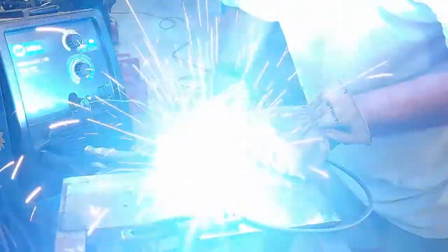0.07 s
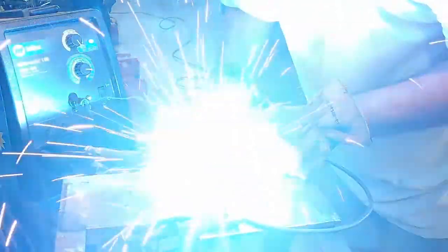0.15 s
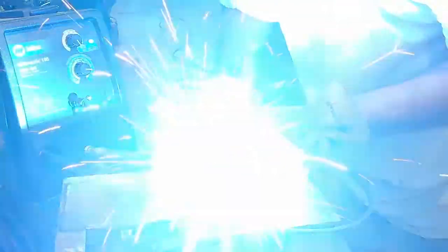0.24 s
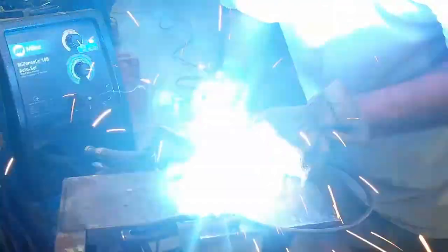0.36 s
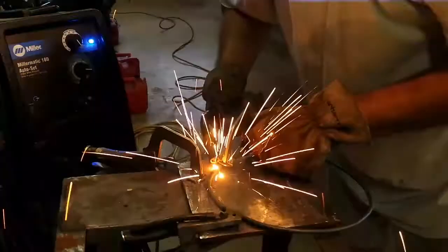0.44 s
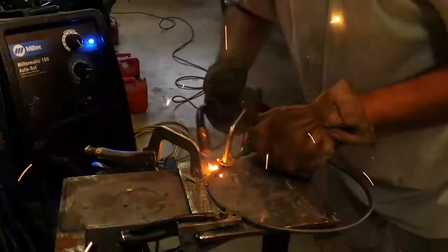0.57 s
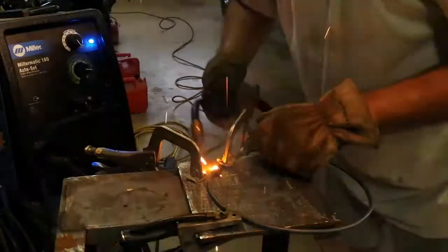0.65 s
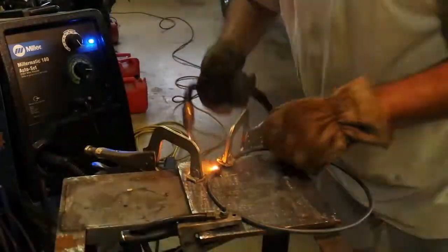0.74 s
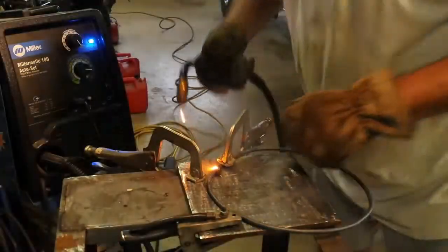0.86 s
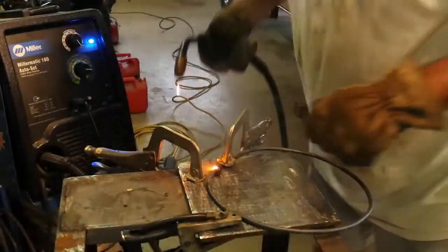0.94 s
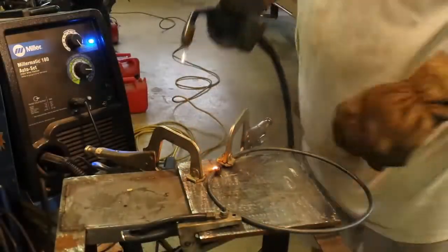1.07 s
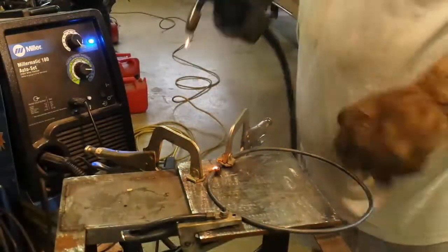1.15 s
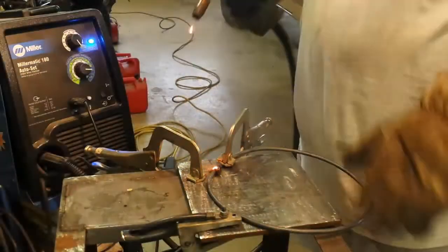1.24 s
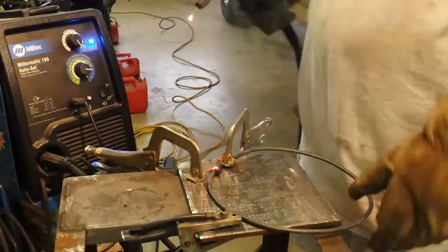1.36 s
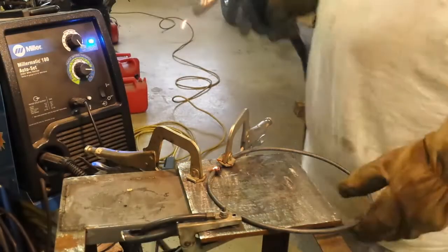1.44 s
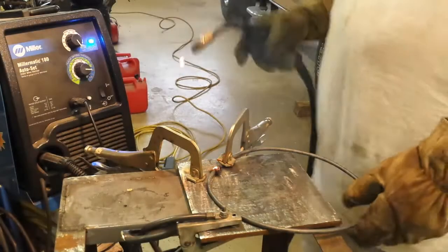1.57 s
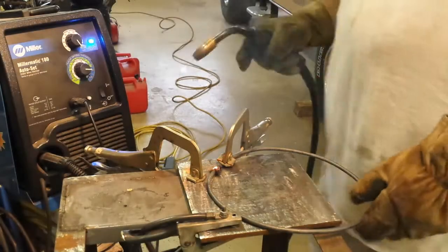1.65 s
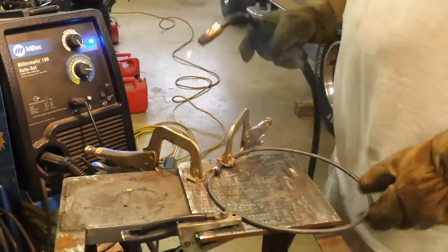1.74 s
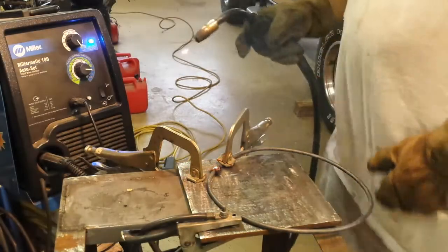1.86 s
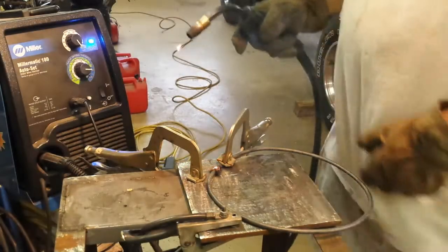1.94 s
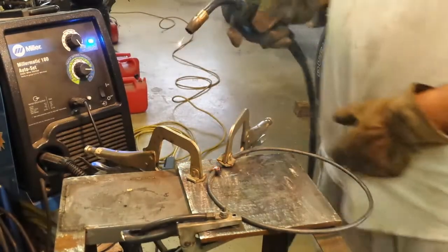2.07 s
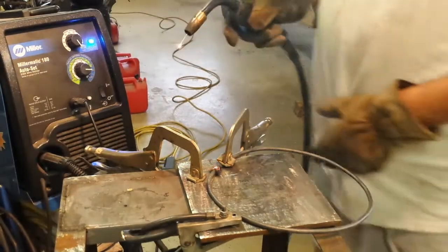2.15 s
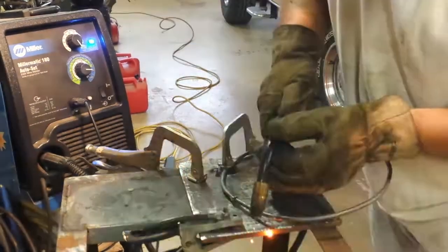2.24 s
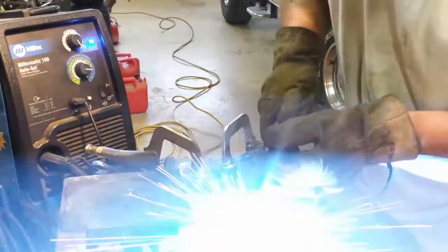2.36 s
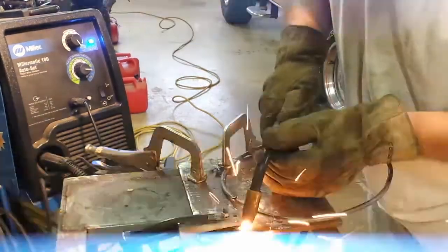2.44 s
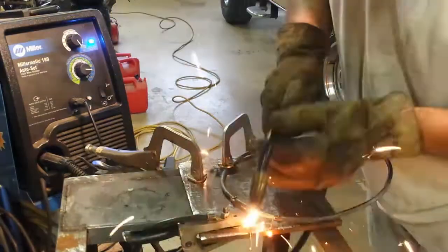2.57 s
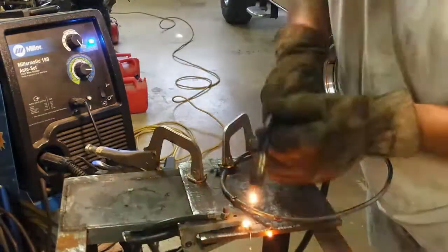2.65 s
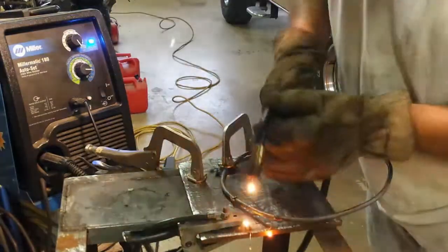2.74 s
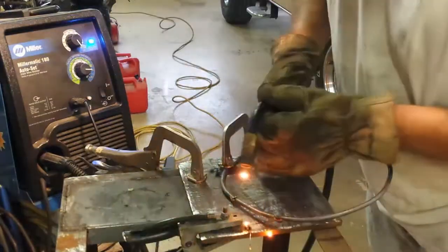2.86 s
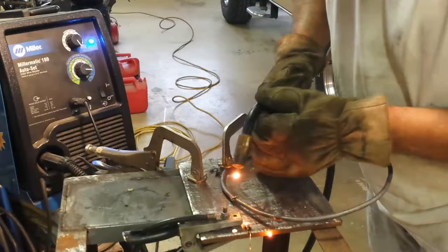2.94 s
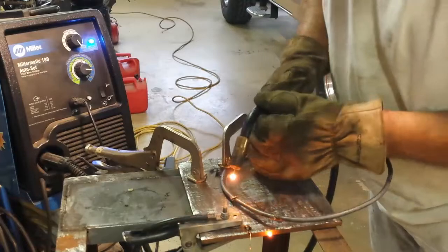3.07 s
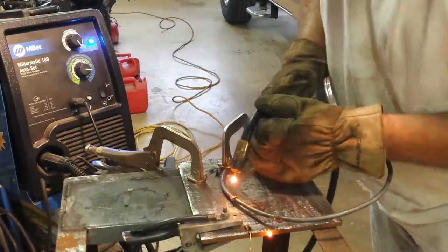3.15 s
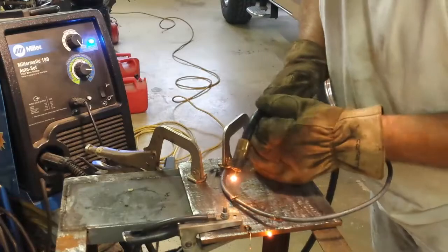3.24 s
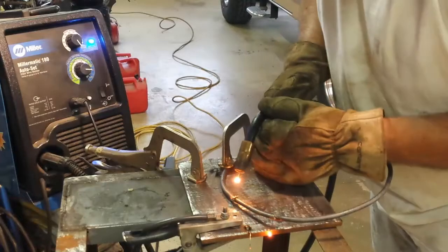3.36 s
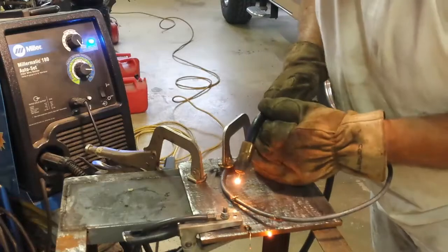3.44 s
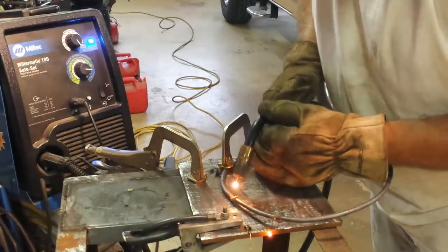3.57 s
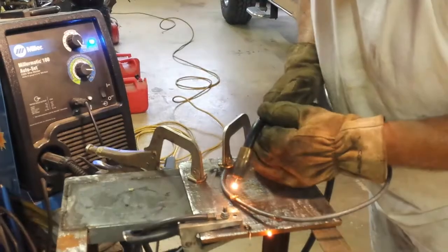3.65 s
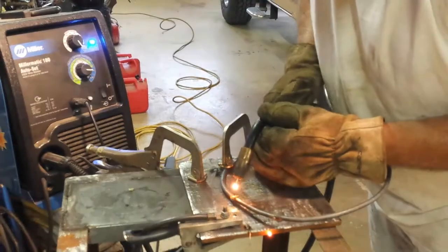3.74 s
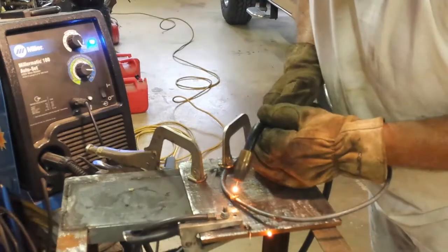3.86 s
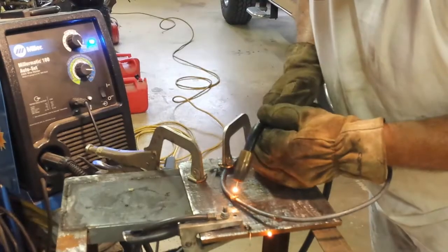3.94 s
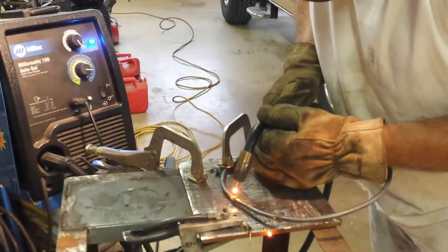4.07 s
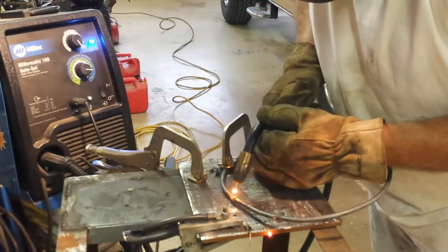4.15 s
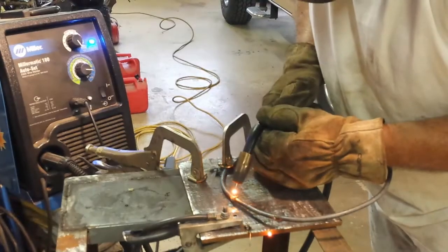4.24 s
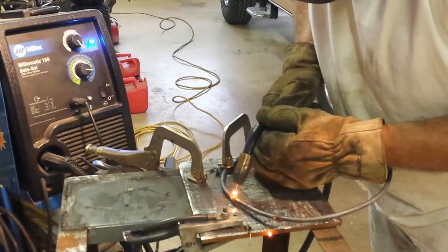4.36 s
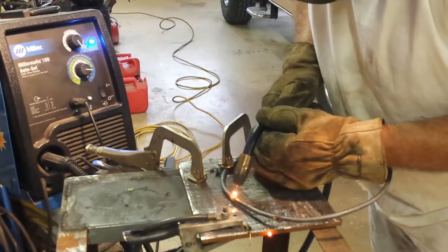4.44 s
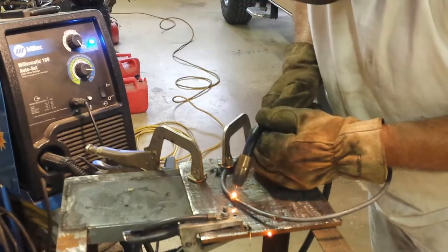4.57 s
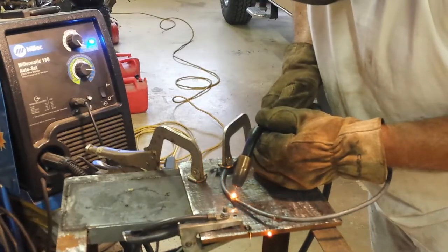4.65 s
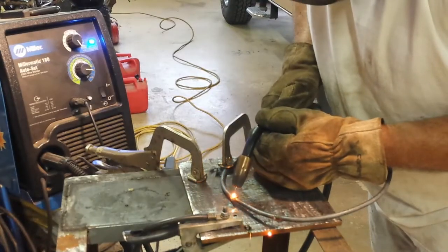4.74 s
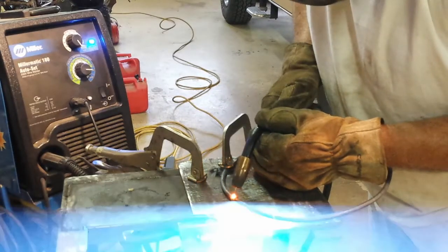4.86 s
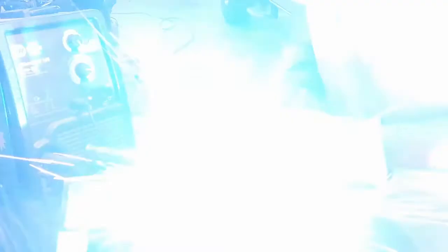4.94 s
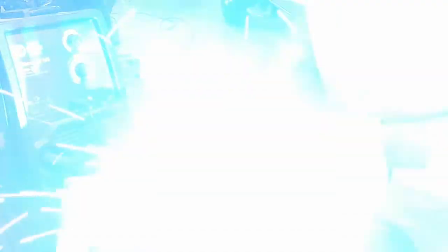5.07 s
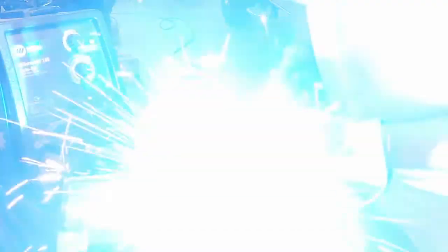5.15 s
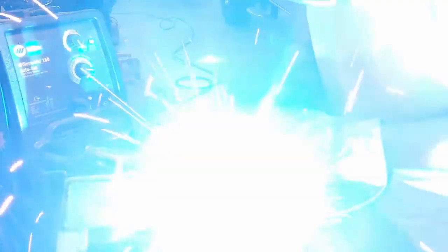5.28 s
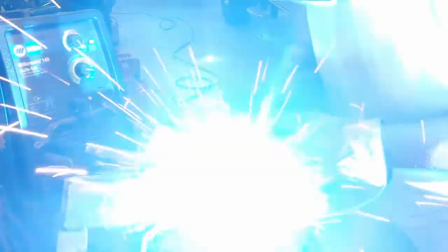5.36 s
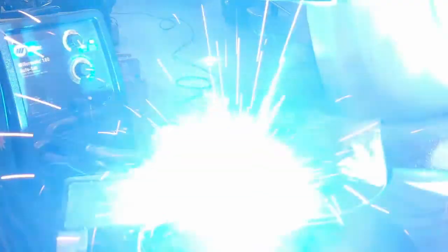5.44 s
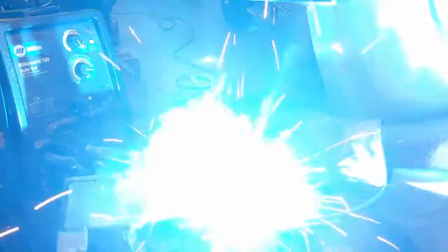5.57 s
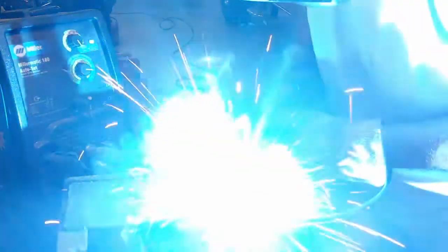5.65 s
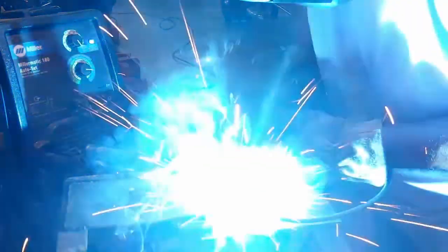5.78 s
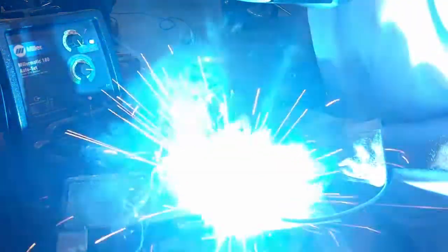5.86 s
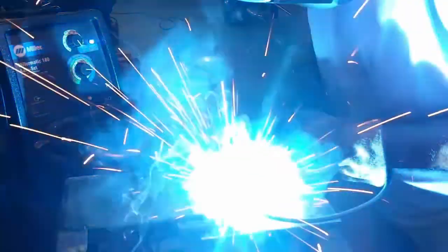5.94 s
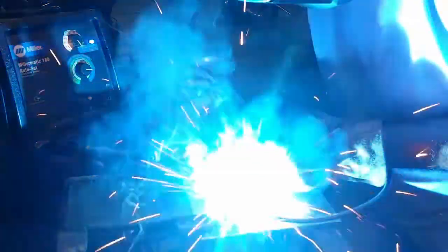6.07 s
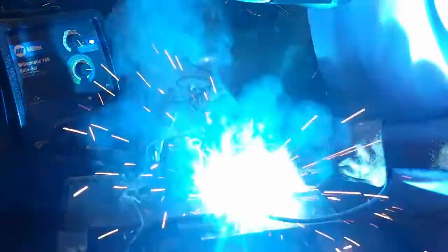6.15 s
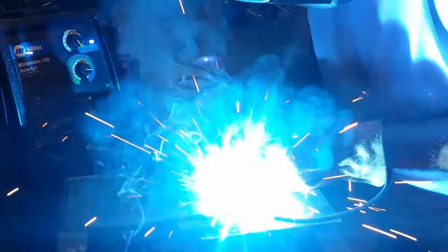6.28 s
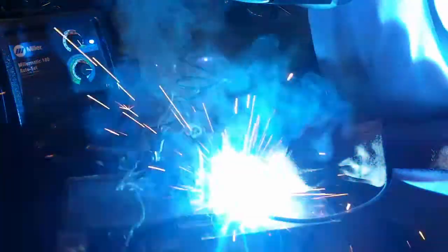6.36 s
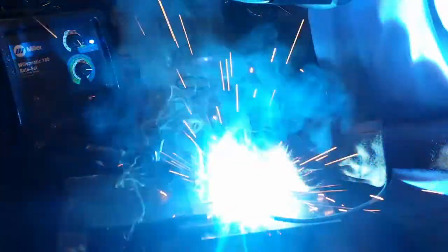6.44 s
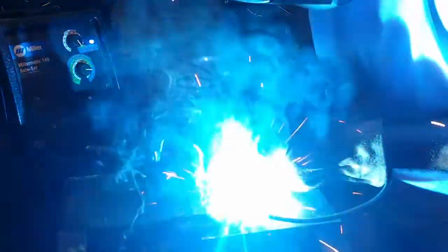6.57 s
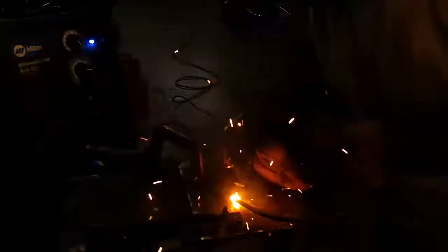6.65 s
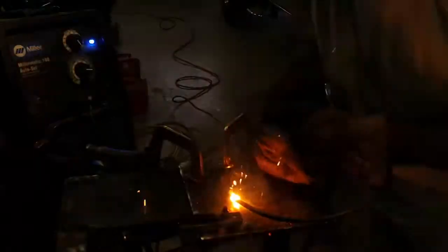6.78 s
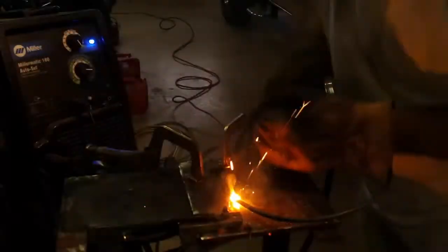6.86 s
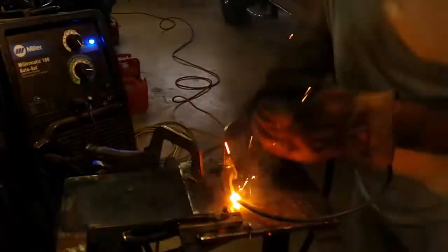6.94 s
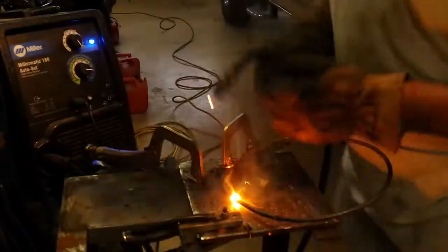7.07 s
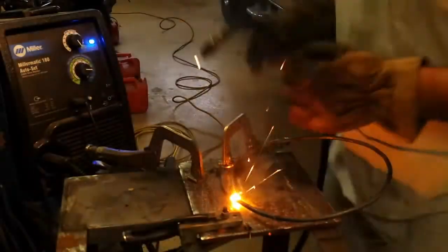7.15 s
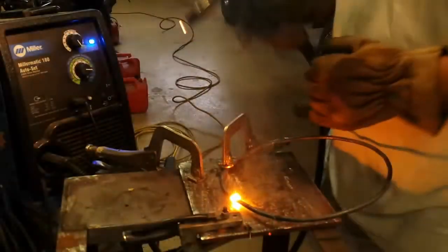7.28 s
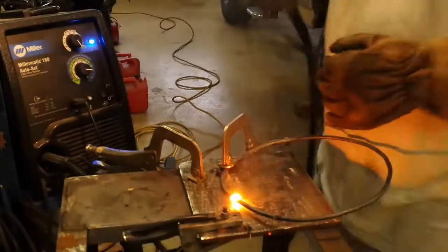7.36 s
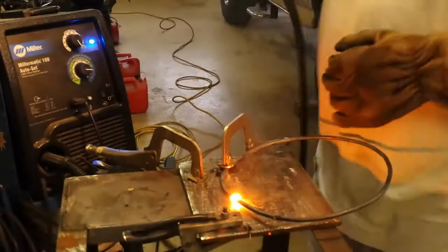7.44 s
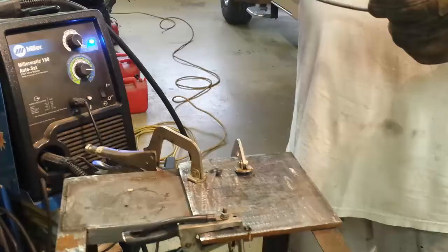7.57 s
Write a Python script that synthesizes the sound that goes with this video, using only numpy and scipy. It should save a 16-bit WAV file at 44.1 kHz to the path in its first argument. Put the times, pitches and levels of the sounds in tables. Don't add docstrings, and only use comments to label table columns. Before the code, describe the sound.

Close, loud arc-welding pops and spitting hiss in three bursts, separated by low cooling-fan hum, with a faint glove brush at the end.

```python
import sys
import numpy as np
from scipy import signal
from scipy.fft import irfft
from scipy.io import wavfile
from scipy.ndimage import uniform_filter1d

SR = 44100
rng = np.random.default_rng(int(sys.argv[2]) if len(sys.argv) > 2 else 0)


def voltage_ratio(level):
    return 10 ** (np.asarray(level, float) / 20)


def pcm_store(signal):
    levels = np.round(np.clip(np.atleast_2d(signal), -1, 1) * 32767)
    wavfile.write(sys.argv[1], SR, levels.astype(np.int16).T)


N = 335601

# frequency in Hz, level in dB per Hz.
FAN_AIR = [(15, -72), (30, -40), (133, -19), (205, -3.5), (235, -6.5), (333, -12), (449, -14.5),
           (513, -13.5), (729, -18.5), (881, -16), (1120, -21.5), (1930, -26), (2330, -32.5), (5820, -35.5),
           (15800, -60)]
# frequency in Hz, width in Hz, level in dB.
FAN_TONES = [(205.8, 0.63, -2), (186.7, 43, -10), (410, 8.3, -15.5), (520, 19, -17.5), (622, 3, -24.5),
             (604, 40, -16.5), (857.4, 99, -12.5), (828, 4, -27.5), (887, 5, -27), (970, 40, -30)]
# start in seconds, end in seconds, fan level in dB during the burst,
# fan level in dB just after.
DUCKS = [
    (-.2, .5, -49, -47.5),
    (2.407, 2.5, -36.5, -45.5),
    (4.943, 6.662, -51, -47.5),
]
# time in seconds, level in dB.
RUSTLE = [
    (7.43, -75),
    (7.46, -60),
    (7.5, -60),
    (7.55, -64),
    (7.59, -70),
]
# frequency in Hz, level in dB per Hz.
RUSTLE_TONE = [(1500, -16), (3000, -2), (5500, -4), (7500, -6), (12000, -20), (15500, -26)]

TORCH_MOVES = (1.5, 4.0)
# frequency in Hz, level in dB per Hz.
TORCH_NEAR = [(150, -30), (700, -14), (900, -7), (1500, -5), (2350, -22), (2900, -6), (4300, -1),
              (5300, -7), (6850, 1), (7750, -17), (9600, -11), (11200, -22), (14000, -17), (15500, -18),
              (17000, -45)]
TORCH_TACK = [(150, -30), (900, -12), (2000, -12), (3000, -26), (4000, -8), (5000, -6), (6300, 0),
              (8000, -5), (9000, -20), (10500, -14), (12000, -27), (14000, -18), (15500, -21), (17000, -45)]
TORCH_SEAM = [(150, -25), (550, -18.5), (1000, -5), (1600, -13.5), (2050, -19), (2800, -9), (4000, -9),
              (5100, -10), (5800, -3), (6700, 0), (7400, -11.5), (8200, -9.5), (12000, -20.5),
              (15200, -12.5), (15700, -15.5), (16600, -40)]
BOUNCE_DB = (-4, -4, 1)
SPREAD_DB = (3, 2.5, -1.25)
SHAKE_DB = (-6, 0, -9)
# delay in ms, level in dB, scatter in ms.
BOUNCES = [(.36, -5, .02), (.55, -7, .03), (.9, -17, .08), (1.5, -20, .3), (3.8, -20, .3)]

# frequency in Hz, t60 in seconds.
GARAGE_DECAY = [(200, .8), (1000, .6), (2300, 0.57), (3200, 0.44), (4300, 0.3), (6000, 0.42), (8000, 0.35),
                (11000, 0.29), (15000, .29)]
# frequency in Hz, level in dB per Hz.
WALLS = [(100, -25.5), (600, -16), (1200, -14), (2200, -16), (3200, -10), (4500, -5.5), (6200, -5),
         (8000, -8), (10000, -9), (12000, -18), (15000, -15), (16500, -41.5)]
# frequency in Hz, spread as a share, level in dB,
# t60 in seconds.
STEEL_MODES = [(3200, .035, -50, .5), (5800, .06, -49, .45), (6400, .05, -50, .35)]
# time in seconds, signed height, length in ms.
KICKS = [
    (2.262, .02, 3.8),
    (5.033, 0.16, 2),
    (5.0555, -0.083, 2.7),
    (5.0781, -.2, 2.3),
    (5.584, 0.14, 2.0),
    (6.177, 0.19, 2.1),
]

# time in seconds, peak in dB.
STUTTERS = [(.3331, -5), (.465, -3), (.4686, -16), (.4761, -18), (2.421, -16), (2.4368, -3), (2.445, -7),
            (2.4513, 2), (2.4755, -12), (2.527, -1), (2.5311, -18), (4.886, -15), (4.8887, -11),
            (4.8927, -12), (4.9596, 1), (4.971, -12), (5.0014, 0), (5.0098, -9), (5.0235, -2), (5.027, -6),
            (5.033, -1), (5.0363, -8), (5.0554, 1)]
# time in seconds, peak in dB.
SPATTER = [(5.2161, -1), (5.3478, 1), (5.3752, -2), (5.3887, -4), (5.5841, -3), (5.6357, -3), (5.7132, -2),
           (5.9764, -2), (6.0521, -3), (6.1769, 1), (6.3007, -4), (6.3186, -2), (6.3463, -5), (6.4687, -2),
           (6.4861, -3), (6.4927, -4)]
# first drop in seconds, last drop in seconds, drops per second,
# peak in dB.
DRIP_RUNS = [(.0047, .0396, 115, -7), (.0497, .1198, 100, -5.5), (.1284, .2269, 122, -4.5),
             (.2382, .3178, 100, -5.5), (5.0714, 5.1001, 139, -3), (5.1096, 5.158, 145, -8),
             (5.1687, 5.2005, 126, -5), (5.2357, 5.2702, 116, -4), (5.2873, 5.3219, 116, -7),
             (5.4005, 5.4436, 139, -6.5), (5.4559, 5.5556, 90, -8), (5.5635, 5.5781, 137, -9),
             (5.5985, 5.6241, 78, -6), (5.6454, 5.7052, 150, -9), (5.7284, 5.8061, 77, -9.5),
             (5.8132, 5.86, 128, -8.5), (5.8707, 5.9516, 74, -8), (5.9624, 5.9697, 137, -9.5),
             (5.9841, 6.0185, 116, -10), (6.0304, 6.0435, 153, -9), (6.0685, 6.0938, 79, -7),
             (6.1016, 6.1586, 140, -10), (6.1823, 6.1887, 310, -14), (6.2044, 6.2483, 68, -6.5),
             (6.2525, 6.2938, 170, -12.5), (6.3563, 6.3854, 137, -11.5), (6.396, 6.4309, 143, -11),
             (6.5006, 6.5513, 138, -11.5), (6.5724, 6.6007, 71, -5), (6.6104, 6.6857, 133, -9.5)]
# start in seconds, end in seconds, start level in dB,
# end level in dB.
BURNS = [(0, 0.048, -27, -31.5), (0.065, 0.35, -32, -43), (2.442, 2.513, -26, -49), (2.419, 2.43, -34, -41),
         (4.887, 4.94, -21.5, -29), (4.968, 5.04, -27, -40), (5.053, 5.317, -50, -31),
         (5.365, 6.192, -30.5, -36.5), (6.177, 6.267, -32.5, -33.5), (6.262, 6.443, -36.5, -39),
         (6.5, 6.68, -34.5, -47)]
# frequency in Hz, level in dB per Hz.
SIZZLE_TONE = [(180, -43), (300, 0), (343, -10.5), (502, -18), (1110, -13.5), (1230, -9), (2630, -21.5),
               (3060, -10), (4480, -12.5), (6670, -9.5), (15800, -27.5)]


def read(points, hz):
    f, value = np.transpose(points)
    return np.interp(np.log(hz + 1), np.log(f + 1), value)


def evened(x):
    return x / np.sqrt(np.mean(x ** 2) + 1e-20)


def curve(rows):
    s, db = np.transpose(rows)
    return voltage_ratio(np.interp(np.arange(N) / SR, s, db, -200, -200))


def noise(points, patchy_db, size):
    frames = 4 * N // size + 5
    hz = np.fft.rfftfreq(size, 1 / SR)
    a, b, patches = rng.standard_normal((frames, len(hz), 3)).T
    patches = uniform_filter1d(patches, size=10, axis=0)
    patches = evened(uniform_filter1d(patches, size=10, axis=1))
    z = (a + 1j * b) * voltage_ratio(read(points, hz)[:, None] + patchy_db * patches)
    return evened(signal.istft(z, nperseg=size, noverlap=size * 3 // 4)[1][:N])


def train(s, shapes, lead):
    out = np.zeros(N + 512)
    start = np.round(s * SR).astype(int) - lead
    np.add.at(out, start[:, None] + np.arange(shapes.shape[1]), shapes)
    return out[:N]


def at_torch(settings, s):
    return np.take(settings, np.searchsorted(TORCH_MOVES, s))


def ducking():
    open_db, creep_db_per_s = -33, 2
    clamp_s, settle_s, ease_s = .025, .12, .3
    hold_s, climb_s = 0.83, 0.46
    rows = []
    for start, end, during_db, after_db in DUCKS:
        opened = rows[-1][0] if rows else start
        rows += [(start, open_db + creep_db_per_s * (start - opened)),
                 (start + clamp_s, after_db),
                 (start + settle_s, during_db),
                 (max(end, start + settle_s), during_db),
                 (end + ease_s, after_db),
                 (end + hold_s, after_db + creep_db_per_s * (hold_s - ease_s)),
                 (end + hold_s + climb_s, open_db)]
    return rows


def fan():
    air_db = -1.5
    jump_s, jump_db = 7.599, -28.5
    t = np.arange(N) / SR
    hum = voltage_ratio(air_db) * noise(FAN_AIR, 1.5, size=2048)
    for hz, width, db in FAN_TONES:
        r = np.exp(-np.pi * width / SR)
        slow = rng.standard_normal((N, 2)) @ [1, 1j]
        for _ in range(2):
            slow = signal.lfilter([1], [1, -r], slow)
        steady = 3.5 if width < 10 else 0
        waver = steady + slow / abs(slow).std() / 2
        hum += voltage_ratio(db) * evened((waver * np.exp(2j * np.pi * hz * t)).real)
    s, db = np.transpose(ducking())
    return evened(hum) * voltage_ratio(np.where(t < jump_s, np.interp(t, s, db), jump_db))


def rustle():
    return noise(RUSTLE_TONE, 2.0, size=256) * curve(RUSTLE)


def garage(x):
    out = np.zeros(N)
    turn = np.arange(N) / SR * 23.0
    for k in range(3):
        taps = np.zeros(SR)
        at = np.arange(120, SR - 12, 12) + rng.integers(0, 12, (SR - 121) // 12)
        taps[at] = rng.choice([-1., 1.], len(at))
        hz, t, z = signal.stft(taps, SR, nperseg=256)
        z = z * voltage_ratio(read(WALLS, hz)[:, None] - 60 * t / read(GARAGE_DECAY, hz)[:, None])
        tail = signal.istft(z, SR, nperseg=256)[1]
        share = np.sqrt(2 / 3) * np.cos(np.pi * (turn + k / 3))
        out += signal.fftconvolve(x * share, tail / np.linalg.norm(tail))[:N]
    return out


def blasts(s, peak_db):
    return train(s, voltage_ratio(peak_db + at_torch(SPREAD_DB, s))[:, None], lead=0)


def kicks():
    t, out = np.arange(N) / SR, np.zeros(N)
    for s, height, ms in KICKS:
        u = np.clip((t - s) * 1000 / ms, 0, 30)
        out += height * np.sin(np.pi * u ** .6) * np.exp(-.8 * u)
    return out


def rod(s, peak_db):
    jolts = train(s, voltage_ratio(peak_db + at_torch(SHAKE_DB, s))[:, None], lead=0)
    t, ring = np.arange(SR // 2) / SR, 0
    for hz, share, db, t60 in STEEL_MODES:
        off, turn = rng.uniform(-1.3, 1, (2, 9, 1))
        modes = np.sin(2 * np.pi * hz * (1 + share * off) * t + np.pi * turn)
        ring = ring + voltage_ratio(db - 60 * t / t60) * modes.sum(0)
    return signal.fftconvolve(jolts, ring)[:N]


def spell(start, end, start_db, end_db):
    catch_s, catch_db, die_s, die_db = .006, -26, .016, -14
    return curve([(start - catch_s, start_db + catch_db), (start, start_db),
                  (end, end_db), (end + die_s, end_db + die_db)])


def sizzle():
    spark_db = 3.0 * np.minimum(rng.exponential(1, N // 16 + 1), 3.5)
    sparks = voltage_ratio(spark_db).repeat(16)[:N]
    burning = sum(spell(*row) for row in BURNS)
    return noise(SIZZLE_TONE, 2.0, size=256) * evened(sparks) * burning


def strikes():
    jitter, uneven_db = .06, 1.6
    slow_gap_s, touch_lead_s, touch_db, touch_share = .007, .0032, -15, .5
    rows = [np.transpose(STUTTERS + SPATTER)]
    for first, last, rate, db in DRIP_RUNS:
        s = np.linspace(first, last, round((last - first) * rate) + 1)
        late, size = rng.standard_normal((len(s), 2)).T
        inner = (s > first) & (s < last)
        rows.append([s + inner * jitter * late / rate, db + uneven_db * np.clip(size, -2, 2)])
    s, db = np.concatenate(rows, axis=1)
    order = np.argsort(s)
    s, db = s[order], db[order]
    luck, late, size = rng.random((len(s), 3)).T
    slow = np.diff(s, prepend=0) > slow_gap_s
    ticks = slow & (s > TORCH_MOVES[1]) & (luck < touch_share)
    tick_s = s - touch_lead_s * (.85 + .3 * late)
    tick_db = touch_db + uneven_db * (2 * size - 1)
    return np.r_[s, tick_s[ticks]], np.r_[db, tick_db[ticks]]


def causal(db, share):
    log = np.log(voltage_ratio(np.concatenate([db, db[:, -2:0:-1]], axis=1)))
    return np.exp(log - 1j * share * signal.hilbert(log, axis=1).imag)[:, :db.shape[1]]


def pops(s, peak_db):
    pops_db, colour_db, scatter_db = 2.2, 2.0, 2.0
    steady_hz = 4000
    front = .8
    twist, smear = 1.1, .55
    hz = np.fft.rfftfreq(512, 1 / SR)
    places = np.array([read(p, hz) for p in (TORCH_NEAR, TORCH_TACK, TORCH_SEAM)])
    colour = places[np.searchsorted(TORCH_MOVES, s)]
    draws = rng.standard_normal((len(s), len(hz) + 2 * len(BOUNCES)))

    wander = evened(uniform_filter1d(draws[:, :len(hz)], size=30, axis=1))
    z = causal(colour + colour_db * wander * np.minimum(hz / steady_hz, 1), front)
    scattered = evened(uniform_filter1d(draws[:, len(hz) - 1::-1], size=14, axis=1)) * np.sqrt(hz / 8000)
    z = z * np.exp(1j * (twist + smear * scattered))

    ms, db, scatter_ms = np.transpose(BOUNCES)
    late, size = np.split(draws[:, len(hz):], 2, axis=1)
    delay = (ms + scatter_ms * late) / 1000
    strength = voltage_ratio(db + scatter_db * size + at_torch(BOUNCE_DB, s)[:, None])
    echoes = np.exp(-2j * np.pi * delay[..., None] * hz)
    comb = 1 + np.einsum("ek,ekf->ef", strength, echoes)
    z = z * comb / (abs(comb) + .1) ** .7

    shape = np.roll(irfft(z, axis=1), 64, axis=1) * signal.windows.tukey(512, .2)
    envelope = abs(signal.hilbert(shape, axis=1))
    shape *= (voltage_ratio(peak_db + pops_db) / envelope.max(1))[:, None]
    return train(s, shape, envelope[:, :76].argmax(1))


def scene():
    arc, hiss = strikes(), sizzle()
    room = garage(blasts(*arc) + voltage_ratio(-9) * hiss)
    mix = fan() + rustle() + room + kicks() + rod(*arc) + hiss + pops(*arc)
    return mix[None]


def low_pass(x):
    return signal.sosfilt(signal.butter(12, 16770, fs=SR, output="sos"), x)


def record(dry):
    taps = signal.firwin(401, 15950, window=("kaiser", 9), fs=SR)
    limited = signal.oaconvolve(dry, taps[None], "same")
    mix = np.clip(limited, -1, 1)
    return low_pass(mix)


dry = scene()
out = record(dry)
pcm_store(out)
```